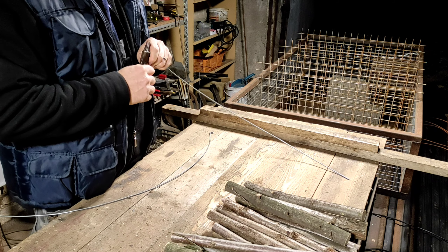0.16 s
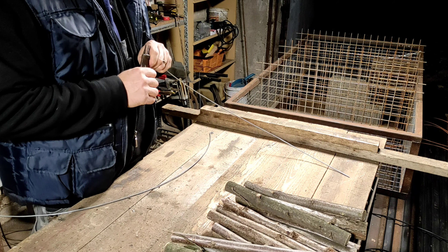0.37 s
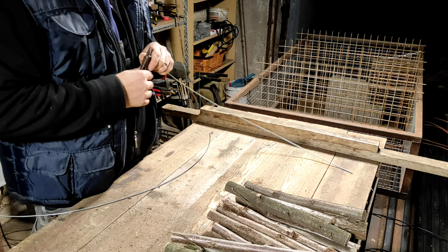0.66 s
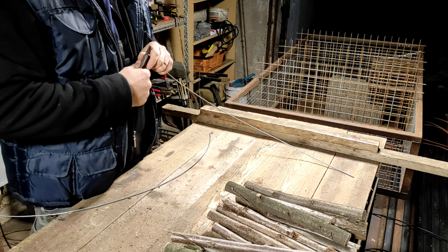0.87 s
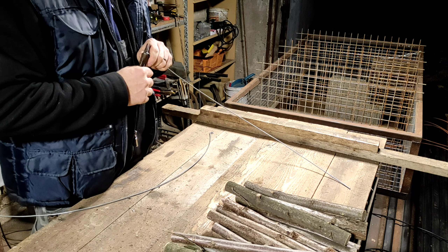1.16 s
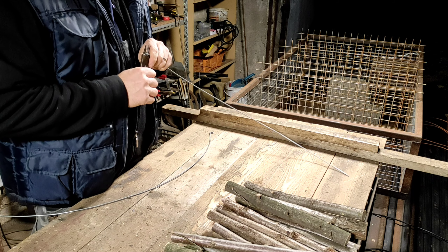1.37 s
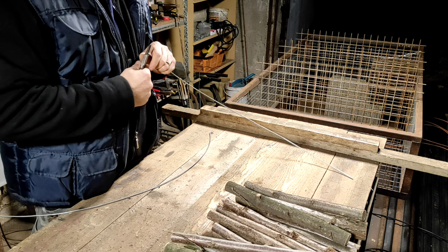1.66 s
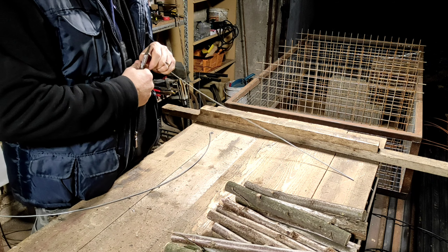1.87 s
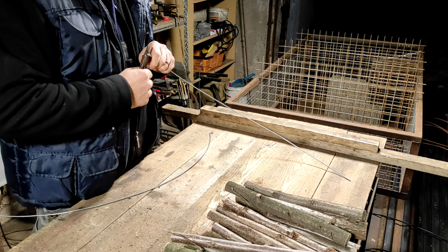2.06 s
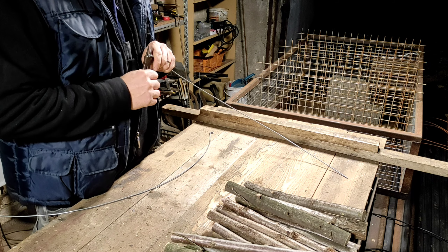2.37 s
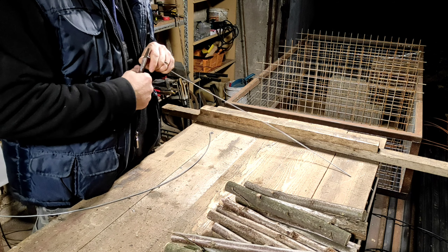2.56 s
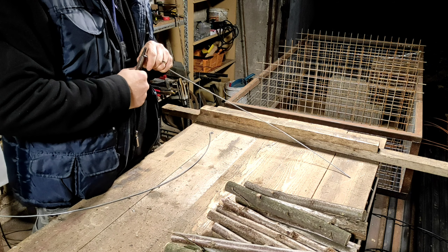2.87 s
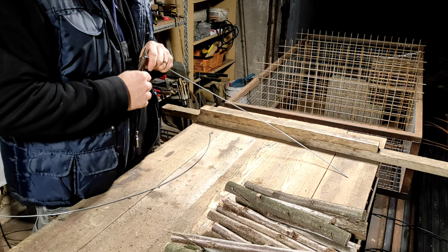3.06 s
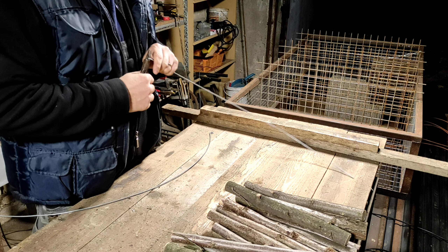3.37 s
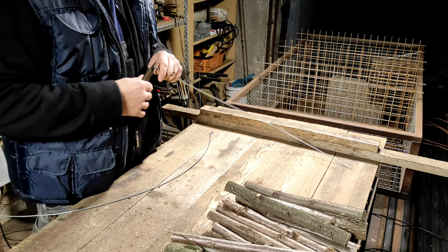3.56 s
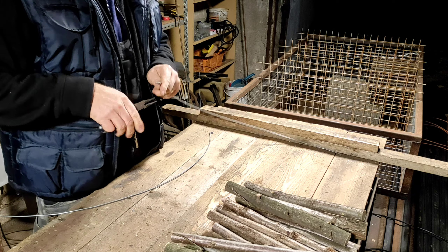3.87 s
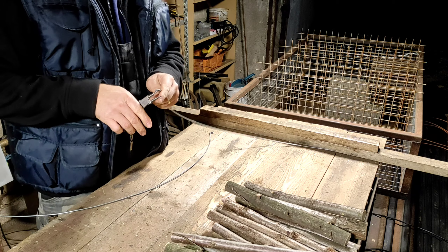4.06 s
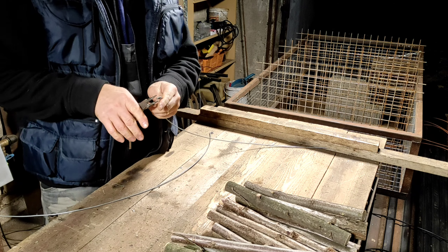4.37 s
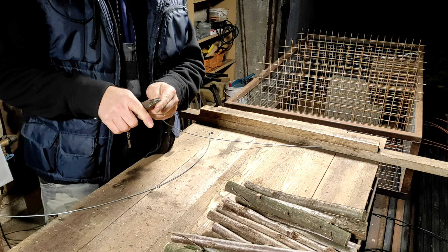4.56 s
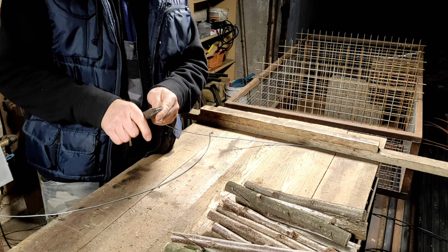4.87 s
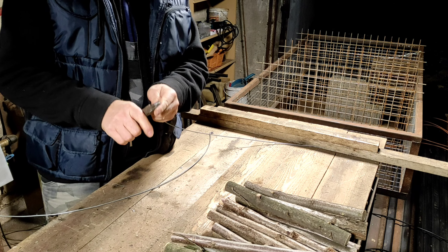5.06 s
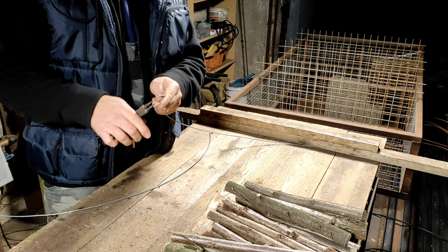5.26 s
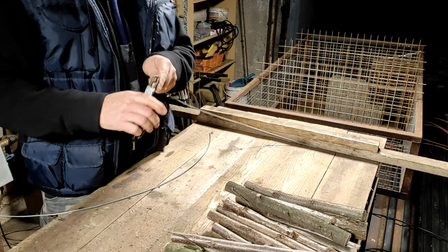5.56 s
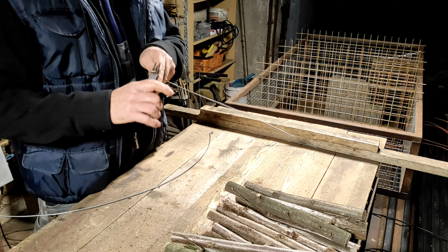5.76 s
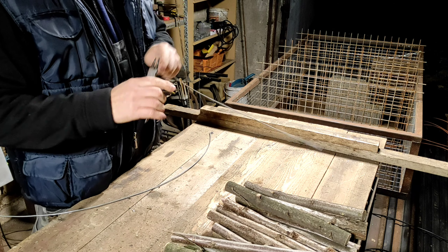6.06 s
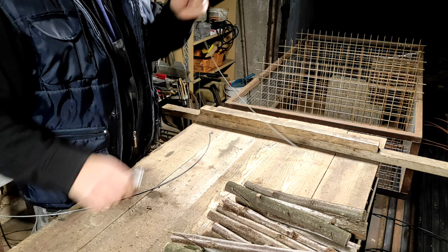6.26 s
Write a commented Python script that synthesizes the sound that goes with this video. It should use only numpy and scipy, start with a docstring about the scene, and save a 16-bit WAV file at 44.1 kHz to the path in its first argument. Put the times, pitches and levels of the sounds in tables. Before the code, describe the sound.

A thick wire taps and drags on a wooden workbench while small pliers clink, with jacket rustle and faint distant traffic.

```python
"""Distant traffic rumbles through workshop walls as a jacket rustles and a long steel wire drags on a bench.
The wire is being bent into a loop with small pliers. Its free end knocks, scuffs and slides on the
wooden boards, driving their damped modes by impact and friction. The plier jaws rasp over the wire
and clink in their own steel modes. Wood and steel are heard directly and as room reverberation."""
import sys
import numpy as np
from scipy import signal
from scipy.io import wavfile

SR = 44100
rng = np.random.default_rng(int(sys.argv[2]) if len(sys.argv) > 2 else 0)


def generate_wav(signal):
    """Clip the signal to [-1, 1] and save it as 16-bit WAV at the path in sys.argv[1]."""
    frames = np.transpose(np.atleast_2d(signal))
    scaled = np.clip(frames, -1, 1) * 32767
    pcm = np.round(scaled).astype(np.int16)
    wavfile.write(sys.argv[1], SR, pcm)


N = 282624


def from_db(db):
    return 10 ** (np.asarray(db) / 20)


def rms_one(x):
    return x / np.sqrt(np.mean(x ** 2) + 1e-20)


def at_hz(points, hz, column=1):
    return np.interp(np.log(hz), np.log(np.array(points)[:, 0]), np.array(points)[:, column])


def band(x, low_hz, high_hz):
    return signal.sosfilt(signal.butter(2, [low_hz, high_hz], "band", fs=SR, output="sos"), x)


def drift(rate_hz):
    """Low-passed Gaussian noise: a slow random fluctuation of unit rms."""
    r = np.exp(-80 * np.pi * rate_hz / SR)
    slow = signal.lfilter([1], [1, -2 * r, r * r], rng.standard_normal(N // 40 + 2002))[2000:]
    return np.interp(np.arange(N) / 40, np.arange(len(slow)), rms_one(slow))


def ring(x, hz, width_hz):
    """Damped resonator: a unit impulse starts a decaying sine of amplitude 1."""
    r, w = np.exp(-np.pi * width_hz / SR), 2 * np.pi * hz / SR
    return signal.lfilter([0, np.sin(w)], [1, -2 * r * np.cos(w), r * r], x + 1e-18)


def grains(size, per_s, spread_db):
    """Poisson process: tiny contacts at random moments with uneven strengths."""
    sizes = from_db(spread_db * np.minimum(rng.exponential(1, size), 4)) * rng.choice([-1, 1], size)
    return sizes * (rng.random(size) < per_s / SR)


# Left-right coherence of the room's sound: f/Hz, coherence/1
COHERENCE = [(30, 0.88), (150, 1), (500, 0.47), (2000, 0.042), (8000, 0.019)]
# Left-right balance of the room's sound: f/Hz, left minus right level/dB
BALANCE = [(30, 4), (150, 6.5), (500, 5), (2000, 0), (8000, 0.5)]
def diffuse_field(mid, side, hz):
    """Partial coherence: two independent noises mix into channels that are alike in the bass only."""
    coherence = at_hz(COHERENCE, hz)
    left_right = np.array([[1], [-1]])
    gain = from_db(at_hz(BALANCE, hz) / 2 * left_right)
    return gain * (np.sqrt(1 + coherence) * mid + np.sqrt(1 - coherence) * side * left_right)


def banded_noise(spectrum, flicker_db):
    """Random amplitude modulation: each third-octave band flickers alone; the mono mix has unit rms."""
    out, edges = 0, 35 * 2 ** (np.arange(27) / 3)
    white = rng.standard_normal((2, 2, N))
    for k, (low, high) in enumerate(zip(edges, edges[1:])):
        hz = np.sqrt(low * high)
        if spectrum[0][0] < hz < spectrum[-1][0]:
            mid, side = band(white[k % 2], low, high)
            gain = from_db(at_hz(spectrum, hz) + flicker_db * drift(rate_hz=4.7))
            out = out + gain * diffuse_field(mid, side, hz)
    return out / np.sqrt(np.mean(out.mean(axis=0) ** 2))


# Traffic heard indoors: f/Hz, relative spectrum level/dB
TRAFFIC_SPECTRUM = [(21, -30), (36, 3.5), (69, -0.5), (123, -8), (190, 1), (285, -7.5), (471, -11.5),
                    (923, -17.5), (1430, -23), (2000, -26), (2600, -48), (4400, -120)]
def traffic():
    """Transmission through walls: mainly the bass of the distant traffic gets in."""
    return from_db(-38.5) * banded_noise(TRAFFIC_SPECTRUM, flicker_db=2.5)


# Brief swells as the hands shift the wire; the row with a 26 s fade is the steady faint drag and rustle
# heard between them: crest t/s, 10 dB drag fade t/s (0.01 if less), drag level/dB, rustle level/dB
SWELLS = [(0.059, 0.03, -47.5, -47), (0.27, 0, -49.5, -48.5), (.5, 26, -61, -50),
          (0.72, -0.07, -42.5, -41.5), (.81, 3.3, -53.5, -49.5), (1.059, -0.54, -34, -43.5),
          (1.15, 0.11, -38, -43.5), (1.502, 0.04, -33, -39), (1.74, 0.08, -45, -41.5),
          (2.202, 0.14, -51, -45.5), (3.428, 0.01, -41, -46), (3.691, -0.0278, -26.5, -47),
          (3.764, 0.0612, -30.5, -33), (3.88, 0.0653, -36, -40.5), (4.07, 0.26, -52, -39.5),
          (4.25, 0.97, -48, -44), (4.641, 0.17, -44.5, -41), (5.0, 0.17, -68, -45.5),
          (5.83, 0.32, -48.5, -46), (5.98, 0.04, -31, -40), (6.3, -0.2, -50.5, -39)]
def swell_levels():
    """Exponential growth and decay: drag and rustle levels in dB follow the loudest swell."""
    t = np.arange(N) / SR
    drag_db, rustle_db = -83, -53   # lower bounds
    for crest_s, fade_s, wire_db, jacket_db in SWELLS:
        loss_db = 10 * abs(t - crest_s) / max(fade_s, .01)
        drag_db = np.maximum(drag_db, wire_db - loss_db)
        rustle_db = np.maximum(rustle_db, jacket_db - loss_db / 1.22)   # the jacket lingers
    return drag_db, rustle_db


# Rustling cloth: f/Hz, relative spectrum level/dB
JACKET_SPECTRUM = [(1200, -20), (2240, 1), (3300, -1.5), (4300, -2), (6000, 4), (8500, -1.5), (11500, -14),
                   (13000, -17), (15500, -22)]
def jacket(level_db):
    """Friction noise: the cloth gives a broad hiss that swells with each movement."""
    return from_db(level_db) * banded_noise(JACKET_SPECTRUM, flicker_db=1.76)


# Modes of the bench boards: f/Hz, bandwidth/Hz, level/dB
BOARD_MODES = [(470, 100, 1), (570, 31, 1.5), (733, 34, 10), (818, 68, 11.5), (936, 95, 9), (1017, 55, 8.5),
               (1193, 86, 12.5), (1287, 110, 10), (1416, 106, 7.5), (1632, 87, 8.5), (1868, 43, 7),
               (2090, 11, 2)]
def wire_drag(level_db):
    """Stick-slip friction: dense slips drive the board modes, whose damping the contact doubles."""
    slips = grains(N, per_s=1600, spread_db=4.4) * from_db(3.1 * drift(rate_hz=27))
    body = 0
    for hz, width, db in BOARD_MODES:
        trim_db = -0.5 if 1100 < hz < 1700 else 0
        body = body + from_db(db + trim_db) * np.sqrt(width) * ring(slips, hz, 2 * width)
    scratch = from_db(1) * band(slips, 1900, 6200)
    return from_db(level_db) * rms_one(body + scratch)


def board_contacts(events, rise_s, impact_db, per_s, grit_db):
    """Modal excitation: an impact and dying chatter ring the boards; the place hit weights the modes."""
    out, size, onset = np.zeros(N + SR), SR // 8, SR // 50
    t = np.arange(size) / SR
    place_dbs = rng.normal(0, 2, (len(events), len(BOARD_MODES)))
    place_tunings = 1 + .012 * rng.standard_normal(place_dbs.shape)
    for event, place_db, tuning in zip(events, place_dbs, place_tunings):
        time_s, level_db, deep_db, tick_db, snap_db, favoured_hz, chatter_s = event
        envelope = np.exp(-t / max(chatter_s, .001)) * np.minimum(t / rise_s, 1) ** 2
        force = rms_one(grains(size, per_s, grit_db)) / 2 * envelope
        force[round(rise_s * SR)] += from_db(impact_db)
        deep = high = 0
        for k, (hz, width, db) in enumerate(BOARD_MODES):
            mode = (-1) ** k * from_db(db + place_db[k]) * np.sqrt(width) * ring(force, hz * tuning[k], width)
            if hz < 1100:
                deep = deep + mode
            else:
                high = high + mode * from_db(-24 * abs(np.log2(hz / favoured_hz)))
        tick, snap = -band(force, 1900, 3300), band(force, 4000, 9000)
        at = round((time_s - rise_s / 2) * SR)
        for part, db in (deep, deep_db), (high, 0), (tick, tick_db), (snap, snap_db):
            out[at:at + size] += from_db(level_db + db) * part / np.sqrt(np.mean(part[:onset] ** 2))
    # wood is too soft for the top octave
    return signal.sosfilt(signal.butter(4, 10500, fs=SR, output="sos"), out[:N])


# The wire end strikes the boards: t/s, high-mode level/dB, then relative to it deep modes/dB, tick/dB,
# wire snap/dB; favoured mode f/Hz, chatter decay t/s
TAPS = [(0.1456, -27.5, 0, -7.5, -13.5, 1570, 0.0042), (0.4504, -42, -14, -24, -25, 1300, 0.002),
        (0.5235, -33.5, 0, -12.5, -30, 1250, 0.0024), (0.7716, -39.5, -0.5, -32, -6.5, 1160, 0.0044),
        (0.8729, -36.5, -2, -9.5, -15, 1340, 0.0018), (1.0779, -42, -2, -4.5, -12, 1300, 0.0015),
        (1.157, -37, -2, -15, -20, 1150, 0.0047), (1.4690, -44, -9, 4, -26, 1250, 0.0026),
        (1.6652, -20, -2.5, -5.5, -4, 1180, 0.0021), (1.7963, -38, -6, -5, -26, 1380, 0.0042),
        (1.9794, -26.5, -3, -8.5, -20, 1420, 0.0022), (2.5875, -35.5, 2.5, -2.5, -2.5, 1310, 0.0015),
        (2.6224, -40, 2, -5.5, 1, 1180, 0.0037), (2.8075, -36.5, -2.5, -6.5, -18, 1350, 0.0014),
        (3.6626, -33.5, -1.5, -12, -9, 1300, 0.006), (3.8237, -18, -9, -12.5, -13, 1405, 0.0039),
        (3.9838, -28, 5.5, -25, -33, 1300, 0.015), (4.6584, -43, -0.5, -9, -16, 1360, 0.001),
        (5.9334, -23, 1, -3, -8, 1660, 0.0025), (6.117, -33.5, -2.5, -6, -12, 1620, 0.0057),
        (6.2532, -31.5, 2.5, -8, -9, 1540, 0.0051)]
def wire_taps():
    """Impulsive excitation: one hard contact starts the board modes at once."""
    return board_contacts(TAPS, rise_s=0.001116, impact_db=10.5, per_s=9000, grit_db=-1.5)


# The wire slides into contact: t/s, high-mode level/dB, then relative to it deep modes/dB,
# wire snap/dB; favoured mode f/Hz, chatter decay t/s
SCUFFS = [(0.4742, -38, -1, -15, 1240, 0.0034), (0.493, -52, -14, -3, 1300, 0.0018),
          (0.5165, -34.5, -1, -42, 1270, 0.0025), (1.1099, -41, 2.5, -6.5, 1200, 0.0073),
          (1.3604, -45.5, -1, -2, 1200, 0.051), (1.385, -35, 9, -12, 1200, 0.0022),
          (1.4561, -36.5, 5.5, -18, 1240, 0.01), (3.0016, -55, 8, 2, 1200, 0.011),
          (3.4874, -51, 9, -3, 1200, 0.013), (3.5846, -38, 3, -10.5, 1330, 0.0045),
          (4.0149, -39, 17, 4, 1190, 0.0017), (4.026, -38.5, 13.5, 1, 1190, 0.0024),
          (4.1557, -45.5, 7.5, -26, 1190, 0.0047), (4.281, -44.5, 5, -6, 1430, 0.0033),
          (4.4564, -49, 7.5, -10, 1200, 0.0065), (4.468, -47, -1, 0, 1870, 0.0021),
          (4.5744, -55, 13, -19, 1800, 0.0038), (4.626, -45, 2, -15, 1600, 0.011),
          (5.285, -45.5, 2, -1, 1360, 0.029), (5.6866, -48, 9, -12, 1190, 0.0023),
          (5.7226, -44.5, -3, -4, 1190, 0.0035), (6.1624, -36, -0.5, 1, 1270, 0.0023)]
def wire_scuffs():
    """Frictional excitation: the force swells over milliseconds; the tick's level follows the snap's."""
    events = [(time_s, level_db, deep_db, -4.9 + 0.56 * snap_db, snap_db, favoured_hz, chatter_s)
              for time_s, level_db, deep_db, snap_db, favoured_hz, chatter_s in SCUFFS]
    return board_contacts(events, rise_s=.006, impact_db=-5, per_s=3000, grit_db=2.5)


# Steel modes of the pliers, for a main ring at 8230 Hz: f/Hz, level/dB, T60/s
PLIER_MODES = [(4790, -12, 0.047), (6000, 1, 0.0088), (6600, 2, 0.014), (8040, 3.5, 0.014),
               (8110, 8.5, 0.011), (8330, 9, 0.0093), (10730, -1.5, 0.075)]
# Clinks: t/s, level/dB, rise t/s, decay t/s, main ring f/Hz, scrape gain/dB,
# gain/dB of a faint high fizz heard with each clink
CLINKS = [(1.467, -34, 0.0023, 0.004, 7960, -12, 1), (1.6645, -49, 0.00075, .002, 6300, 16, 19),
          (1.725, -41, 0.0091, 0.018, 6800, 18, -5), (2.622, -23.5, 0.0023, 0.0033, 6530, 8, 15.5),
          (4.1408, -22, 0.0015, 0.0043, 8370, -5.5, -5), (4.574, -26, 0.0022, 0.0059, 8080, -24, 7),
          (5.306, -24, 0.012, 0.0095, 8500, 2.5, -10), (5.719, -24.5, 0.0059, 0.0059, 8190, -24, 3),
          (5.884, -28.5, 0.0043, 0.0036, 8550, 12, 15.5), (6.1553, -9.5, 0.015, 0.014, 8140, -5.5, -8)]
def plier_clinks():
    """Free vibration: a brief rasp sets the jaws ringing; the grip shifts all their modes together."""
    out, size = np.zeros(N + SR), SR // 4
    t = np.arange(size) / SR
    for time_s, level_db, rise_s, decay_s, ring_hz, scrape_db, fizz_db in CLINKS:
        envelope = (1 - np.exp(-t / rise_s)) * np.exp(-t / decay_s)
        rasp = rms_one(grains(size, per_s=5000, spread_db=3)) * envelope
        steel = sum(from_db(db - 30) * ring(rasp, hz * ring_hz / 8230, np.log(1000) / (np.pi * t60))
                    for hz, db, t60 in PLIER_MODES)
        scrape = from_db(scrape_db) * band(rasp, 4200, 9300)
        fizz = from_db(fizz_db) * band(rasp, 10000, 14500)
        at = round(time_s * SR)
        out[at:at + size] += from_db(level_db) * (steel + scrape + fizz)
    return out[:N]


# Reverberation of the workshop: f/Hz, T60/s, tail level/dB
ROOM_DECAY = [(386, 0.57, 2), (970, 0.26, 3.5), (2200, 0.37, 7), (9500, 0.2, 10)]
def room_response():
    """Diffuse reverberation: after a short gap, noise builds up and decays exponentially in each band."""
    t = np.arange(SR // 2) / SR
    gap_s, build_s, early_s = 0.0018, 0.0013, 0.057
    tail, edges = 0, 354 * 2 ** (np.arange(12) / 2)
    for low, high in zip(edges, edges[1:]):
        hz = np.sqrt(low * high)
        decay = from_db(at_hz(ROOM_DECAY, hz, column=2) - 60 * t / at_hz(ROOM_DECAY, hz))
        noises = band(rng.standard_normal((2, len(t))), low, high)
        mid, side = (rms_one(noise) * np.sqrt(hz / SR) for noise in noises)
        tail = tail + decay * diffuse_field(mid, side, hz)
    near_walls = from_db(3 / (1 + (t / early_s) ** 8))   # early reflections are stronger
    build_up = (t > gap_s) * np.sqrt(1 - np.exp(-t / build_s))
    return tail * near_walls * build_up / np.sqrt(.04 * SR)


def workshop(x, place_s=.3):
    """A room's response depends on source position: the wandering wire end cross-fades among four."""
    turn = np.arange(N) / SR / place_s
    shares = [np.sqrt(np.clip(1 - abs((turn - k + 2) % 4 - 2), 0, 1)) for k in range(4)]
    return sum(signal.fftconvolve((x * share)[None], room_response(), axes=1)[:, :N] for share in shares)


def scene():
    """Superposition: direct and reverberant bench sounds add to the rustle and the rumble."""
    drag_db, rustle_db = swell_levels()
    wood = wire_taps() + wire_scuffs() + wire_drag(drag_db)
    # narrow boards radiate no bass
    wood = signal.sosfilt(signal.butter(8, 470, "high", fs=SR, output="sos"), wood)
    steel = plier_clinks()
    direct = wood * from_db([[.6], [-.6]]) + steel * from_db([[2.5], [-2.5]])
    left_lag_s = .00009   # the bench is nearer the right microphone port
    direct[0] = np.roll(direct[0], round(left_lag_s * SR))
    return direct + jacket(rustle_db) + traffic() + from_db(-5.5) * workshop(wood + steel)


def microphone(x, edge_hz=9490, top_db=-12.5):
    """Frequency response: beyond a steep edge, the top octave arrives much weaker."""
    low = signal.sosfilt(signal.cheby2(10, 50, 1.08 * edge_hz, fs=SR, output="sos"), x)
    top = signal.sosfilt(signal.butter(6, 1.12 * edge_hz, "high", fs=SR, output="sos"), x)
    return low + from_db(top_db) * top


def record(dry):
    """Amplitude and band limiting: the microphone signal is held within full scale, then low-passed."""
    clipped = np.clip(microphone(dry), -1, 1)
    return signal.sosfilt(signal.cheby2(12, 70, 15700, fs=SR, output="sos"), clipped)


dry = scene()
out = record(dry)
generate_wav(out)
```